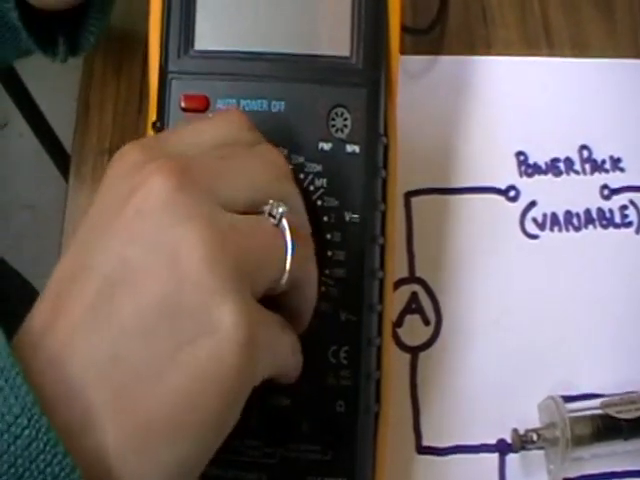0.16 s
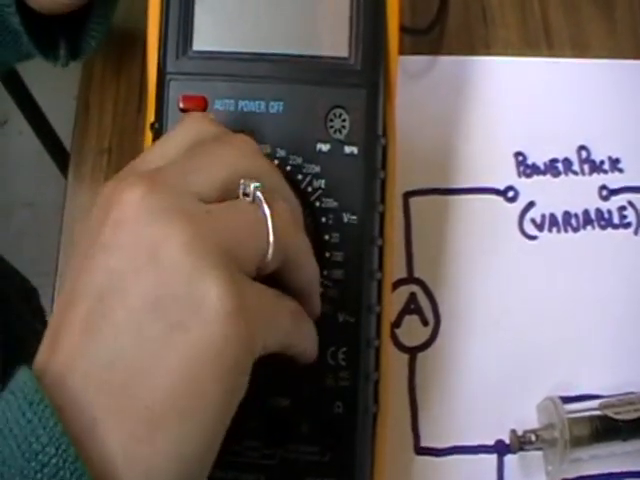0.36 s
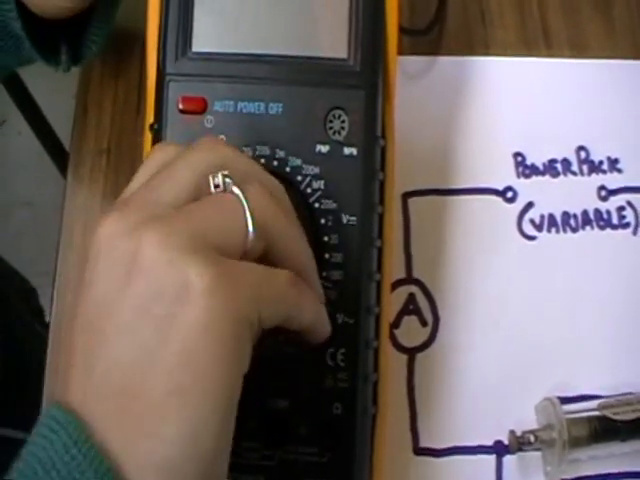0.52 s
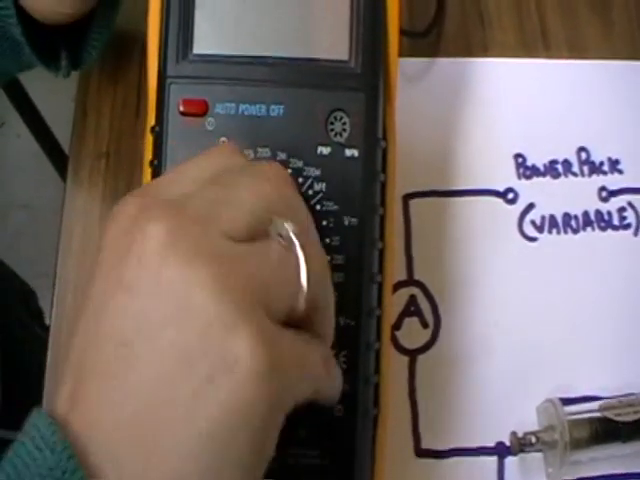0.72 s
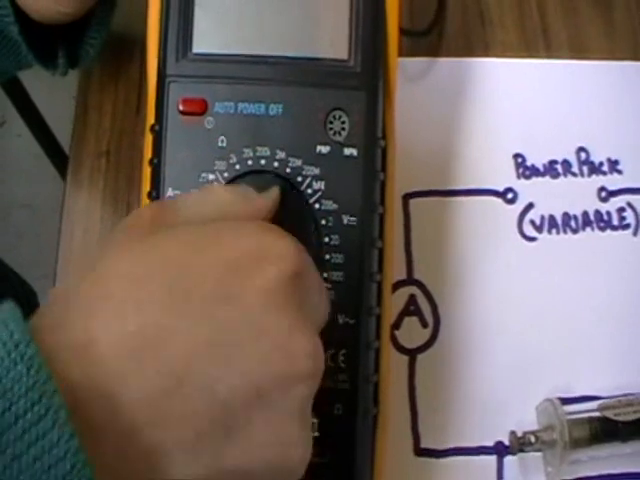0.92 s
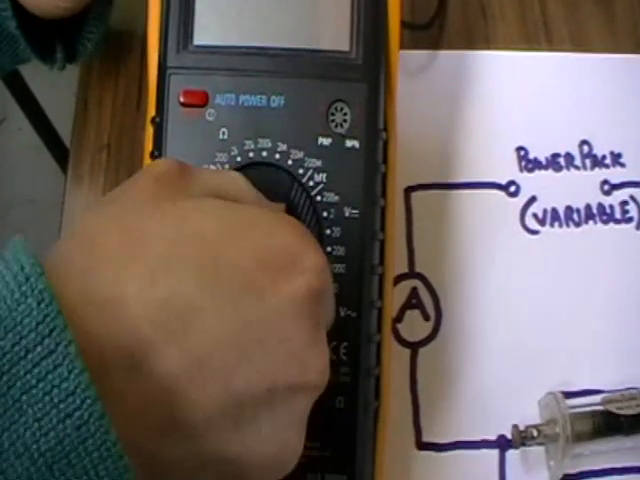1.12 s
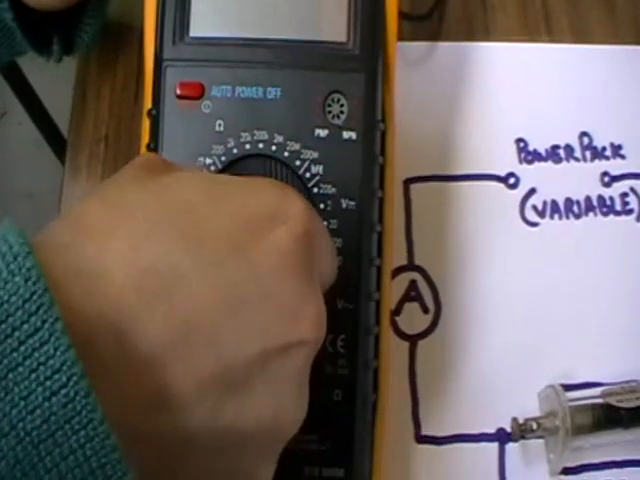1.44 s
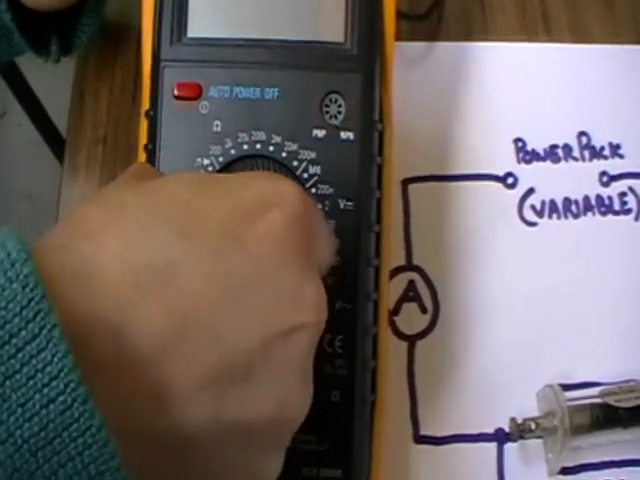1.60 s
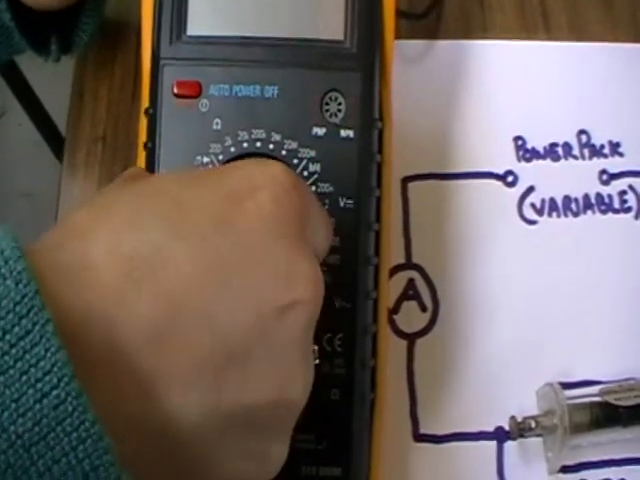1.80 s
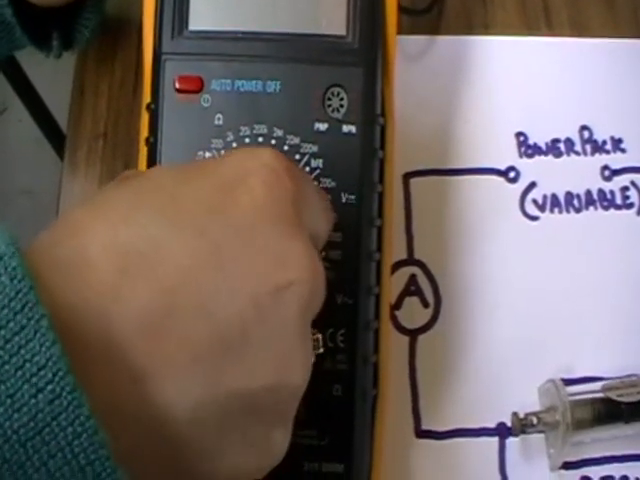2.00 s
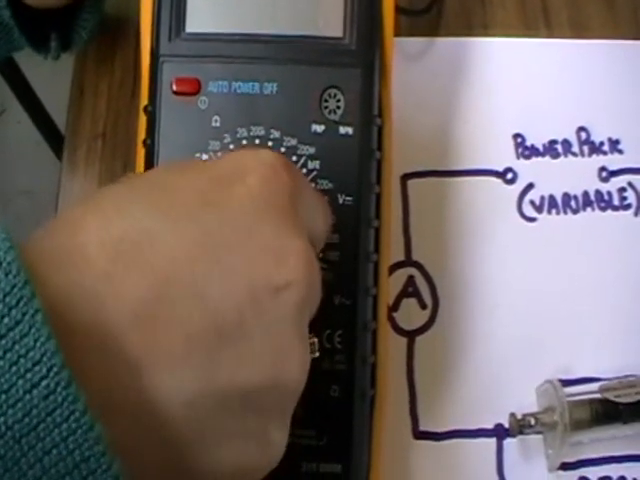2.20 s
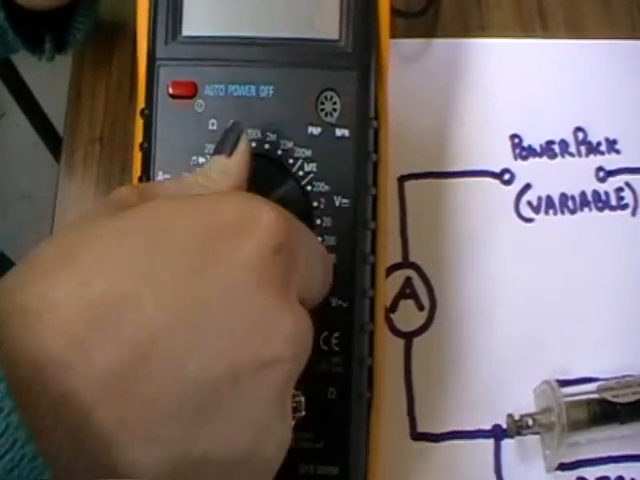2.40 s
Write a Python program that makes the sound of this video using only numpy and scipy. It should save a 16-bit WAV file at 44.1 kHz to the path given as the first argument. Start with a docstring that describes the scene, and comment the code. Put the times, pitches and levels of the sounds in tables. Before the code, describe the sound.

Sharp plastic dial clicks in two quick groups as a hand turns a meter's selector switch

```python
"""In a small quiet room with a faint hum, a hand turns the rotary selector of a plastic multimeter.
The meter lies on a wooden desk, close to the microphones. At each detent (a notch of the selector) a spring
chatters for a few milliseconds and rings the case: short noise bursts through resonances.
The desk adds soft low thumps. The loose knob ticks, fingers knock and rub it, and it creaks once, from
uneven slips. Random echoes that die away make the room, and filtered noise with two tones its background."""
import sys
import numpy as np
from scipy import signal
from scipy.fft import rfft, irfft
from scipy.io import wavfile
from scipy.ndimage import uniform_filter1d

SR = 44100
rng = np.random.default_rng(int(sys.argv[2]) if len(sys.argv) > 2 else 0)


def output_pcm(signal):
    """Save a mono or channel-first signal as 16-bit PCM at the path in sys.argv[1].

    Samples are clipped to [-1, 1] before scaling.
    """
    pcm = np.clip(np.atleast_2d(signal).T, -1, 1) * 32767
    wavfile.write(sys.argv[1], SR, np.round(pcm).astype(np.int16))


N = 112454  # length in samples

# steady air noise of the room: f/Hz, gain/dB
AIR_COLOUR = [(15, -80.5), (25, -42), (64, -17), (108, -11), (145, -6.5), (249, -10), (277, -4.5),
              (354, -13), (531, -15), (695, -20), (2280, -24), (3520, -28.5), (16000, -43.5)]
AIR_DB = -53.5  # level of the part shared by left and right
# left-right difference of the air noise, against the shared part: f/Hz, gain/dB
AIR_SIDE = [(30, -1.5), (60, -11), (120, -21.5), (1000, -11), (5000, -9), (12000, 0.5)]
# tones of the hum: f/Hz, level/dB
HUM_TONES = [(279.9, -62), (538.3, -71)]
HUM_WAVER_DB, HUM_WAVER_RAD, HUM_WAVER_HZ = 1, 0.13, 8.7  # typical level and phase wander, fastest wander

# tone of the room reflections: f/Hz, gain/dB
ECHO_COLOUR = [(100, 11), (400, 3.5), (1500, 1.5), (3000, 0), (6000, -5), (9000, -5.5), (15000, -7)]
# time for the room to fall by 60 dB: f/Hz, time/s
ECHO_DECAY = [(150, .4), (700, 1), (2000, 0.41), (5000, 0.53), (13000, 0.55)]
TAIL_DB, EARLY_DB = -19.5, -19.5  # before the room's tone is applied
EARLY_FALL_S, ECHO_START_S, ECHO_RISE_S = 0.022, 0.003, 0.0019
ECHO_SIDE = 0.41  # share of the reflections that differs between left and right

# soft dull rubbing on the knob, between and around snaps: middle t/s, half length/s, level/dB
SKIN_RUBS = [(0.825, 0.082, -54), (0.92, .007, -42.5), (1.221, .006, -55.5), (1.259, 0.04, -57.5),
             (1.492, 0.036, -47), (1.76, 0.025, -50.5), (2.057, .005, -56.5)]
RUB_TOP_HZ = 3000

# loudness of the creak over time: t/s, level/dB
CREAK_LOUDNESS = [(1.117, -38.5), (1.123, -35.5), (1.128, -29.5), (1.144, -38), (1.15, -36), (1.164, -36.5),
                  (1.168, -25.5), (1.178, -31), (1.183, -38.5), (1.205, -54)]
# case resonances that the creak excites: f/Hz, width/Hz, gain/dB
CREAK_RESONANCES = [(750, 105, -5.5), (1523, 110, 5.5), (1950, 250, -8), (2320, 84, 2.5), (2900, 120, -5),
                    (3720, 180, -8.5), (4600, 380, -16.5), (5480, 450, -32), (8400, 400, -23),
                    (11300, 690, -30)]
SLIP_HZ, SLIP_SCATTER = 604, 0.45  # middle slip rate, unevenness of the gaps (natural-log units)
SLIP_STRENGTH_DB, CREAK_GRIT, CREAK_TOP_HZ = 2, 0.76, 12000  # strength scatter, noise share, top edge

# thumps of the meter rocking on the desk: t/s, level/dB
DESK_THUMPS = [(.202, -45), (0.24, -31.5), (.434, -30.5), (0.46, -33), (.592, -52.5), (0.623, -46.5),
               (1.115, -35), (1.325, -32.5), (1.473, -36), (1.508, -38), (1.609, -43.5), (1.758, -40.5),
               (2.458, -41.5)]
# tone of a desk thump: f/Hz, gain/dB
DESK_COLOUR = [(30, -27.5), (60, -20), (100, -4.5), (140, -3.5), (200, -4.5), (270, -8), (450, -11.5),
               (900, -35), (3000, -76.5)]
THUMP_RISE_S, THUMP_FALL_S = 0.0017, 0.013

# light ticks of the loose knob and its contacts: t/s, level/dB, chatter/ms, top edge f/Hz
KNOB_TICKS = [(0.1898, -32.5, 1.1, 6900), (0.8144, -41, 2.1, 3500), (1.0226, -36.5, 0.39, 7240),
              (1.0698, -42.5, 0.87, 6900), (1.3170, -32, 1.9, 7000), (1.4474, -41.5, 1.23, 6960),
              (1.5747, -40, 8.3, 6000), (1.6041, -26, 2.8, 7600), (1.629, -42.5, 5.5, 4500),
              (1.767, -32.5, 0.82, 6000), (1.8779, -50.5, 1.47, 6970), (2.146, -33.5, 4, 7000),
              (2.157, -35.5, 5.3, 6000), (2.488, -47, 0.88, 10900)]
# finger knocks on the knob: t/s, level/dB, hollow f/Hz, hollow level/dB, brightness/dB, top edge f/Hz
FINGER_KNOCKS = [(1.0204, -36.5, 740, -34, -1, 3970), (1.1138, -24.5, 750, -56, -3.5, 8240),
                 (2.457, -31, 451, -26, 7, 9400), (2.479, -59, 600, -44.5, 0, 4000)]
# tone of ticks, knocks and rubs: f/Hz, gain/dB
KNOB_COLOUR = [(100, -14), (500, 0.5), (1000, -3.5), (1600, 0), (2300, 1.5), (4000, -2.5), (6000, -3),
               (9000, -11.5), (16000, -27.5)]
KNOCK_MS, KNOCK_BRIGHT_HZ = 0.99, 4800
HOLLOW_WIDTH, HOLLOW_FALL_MS = 0.92, 4.2  # width as a share of the pitch, fall time

# detent snaps: t/s, level/dB, chatter/ms, body/dB, treble/dB, top edge f/Hz, band f/Hz, its gain/dB
DETENT_SNAPS = [(0.1994, -5.5, 1.32, 0, 2, 14100, 3200, 1), (.2356, -11.5, 2.24, -0.5, 0, 15800, 5750, 2.5),
                (0.4318, -7.5, 2.0, -1.5, 3, 16700, 4600, -2), (0.453, -10, 3.1, 3, 0.5, 14900, 5480, 6.5),
                (0.588, -5.5, 3.56, 4, 7.5, 14380, 6600, 7.5),
                (0.6084, -11, 1.9, -1.5, 5.5, 14700, 4600, 8.5),
                (0.7862, -22, 1.8, 14.5, 5, 12700, 4450, 6.5),
                (1.3247, -8.5, 4.45, 2.5, 3, 14500, 5680, 5.5), (1.469, -14, 1.4, -1.5, 8, 12500, 6000, 12),
                (1.4729, -15.5, 2, 6, 1, 12000, 8100, 15), (1.504, -31, 1.7, 9.5, 7, 12000, 5700, 9),
                (1.5973, -15, 1.1, 0.5, 6, 12300, 5700, 6),
                (1.756, -22.5, 3.3, 7.5, 17.5, 10130, 9500, -0.5),
                (2.1403, -21, 1.9, 3.5, 14.5, 10400, 7500, 0)]
# resonances of the plastic case: f/Hz, width/Hz, gain/dB
CASE_RESONANCES = [(1060, 40, -17.5), (1518, 105, -5), (2196, 380, -5.5), (2810, 180, -9),
                   (3200, 140, -7.5), (3780, 440, -6), (4503, 210, -0.5), (5616, 457, 3), (6824, 990, -4.5),
                   (8100, 260, -8.5), (9500, 360, -10.5), (11430, 540, -12), (14400, 310, -24.5),
                   (15200, 500, -12)]
CRACK_DB, CRACK_LOW_HZ = -21.5, 120  # broad crack mixed with the resonances, its low edge
BODY_HZ, TREBLE_HZ, BAND_WIDTH_HZ = 3200, 7160, 900
TOP_SHELF_DB = -24.5  # what is left above a snap's top edge
LEAD_IN_DB, LEAD_IN_MS = -23.5, 1.1  # faint short noise just before each snap, level against the snap
CHATTER_RISE_MS, CHATTER_FALL_MS = 0.67, 0.99
RING_DB, RING_MS = -17.5, 5.8  # faint ring after the chatter, its fall time
SCATTER_HZ, SCATTER_SIDE = 10000, 0.64  # above this edge left and right hear a snap differently

# how much louder left is than right, for everything but the room tone: f/Hz, difference/dB
LEFT_OVER_RIGHT = [(250, -0.5), (1500, 1.1), (2500, 1.1), (4500, -0.8), (9000, -0.6), (13000, -2.5)]
CEILING, TOP_HZ = 0.8, 15800  # peaks are rounded towards the ceiling; treble is cut above the top

CLICK_SIZE = 8192  # samples computed for each short sound


def undb(db):
    """Turn decibels into a plain factor."""
    return 10 ** (np.asarray(db) / 20)


def unit(x):
    """Scale to an rms (average strength) of 1."""
    return x / np.sqrt(np.mean(x ** 2) + 1e-20)


def blow(x, db):
    """Scale a short sound so that its energy, spread over 4 ms, has this level."""
    return x * undb(db) * np.sqrt(0.004 * SR / np.sum(x ** 2))


def freqs(size):
    """Frequencies in Hz of a spectrum of this many samples, never below 1 Hz."""
    return np.maximum(np.fft.rfftfreq(size, 1 / SR), 1)


def curve(points, f):
    """Read (Hz, value) points on a log-frequency axis."""
    p = np.array(points, float)
    return np.interp(np.log(f), np.log(p[:, 0]), p[:, 1])


def shape(x, gain):
    """Filter with the given gain per frequency, without sounding ahead of its input."""
    size = len(x)
    # folding the cepstrum (the spectrum of the log gain) forward gives minimum phase
    cepstrum = irfft(np.log(gain + 1e-7), size)
    cepstrum[1:size // 2] *= 2
    cepstrum[size // 2 + 1:] = 0
    return irfft(rfft(x) * np.exp(rfft(cepstrum)), size)


def resonances(modes, f):
    """Gain of a set of resonances, their powers added."""
    power = 0
    for hz, width, db in modes:
        detuning = (f * f - hz * hz) / (f * width)
        power = power + undb(db) ** 2 / (1 + detuning ** 2)
    return np.sqrt(power)


def below(f, hz, order=4):
    """Gain that passes what lies below an edge; a higher order is steeper."""
    return 1 / np.sqrt(1 + (f / hz) ** (2 * order))


def add(out, s, x):
    """Mix a short sound in at a time in seconds."""
    i = int(s * SR)
    out[i:i + len(x)] += x[:len(out) - i]


def burst(envelope, size=200):
    """Dense random impacts under an envelope, with an even broad spectrum."""
    x = rng.standard_normal(len(envelope)) * envelope
    for _ in range(2):
        power = uniform_filter1d(abs(rfft(x)) ** 2, size)
        x = shape(x, 1 / np.sqrt(power + 1e-12))
    return x


def chatter(ms):
    """A contact that builds up, rattles briefly, dies away and leaves a faint ring."""
    t_ms = np.arange(CLICK_SIZE) / SR * 1e3
    after = np.maximum(t_ms - ms, 0)
    rise = 1 - np.exp(-t_ms / CHATTER_RISE_MS)
    fall = np.exp(-after / CHATTER_FALL_MS)
    ring = undb(RING_DB) * np.exp(-after / RING_MS)
    return burst(rise * (fall + ring), size=130)


def waver():
    """Slow random wandering with an rms of 1."""
    return unit(shape(rng.standard_normal(N), below(freqs(N), HUM_WAVER_HZ, order=2)))


def room_tone():
    """Soft steady air noise from filtered noise, with a hum of wavering sine tones."""
    f, t = freqs(N), np.arange(N) / SR
    gain = undb(curve(AIR_COLOUR, f))
    mid = shape(rng.standard_normal(N), gain)
    side = shape(rng.standard_normal(N), gain * undb(curve(AIR_SIDE, f)))
    air = np.array([mid + side, mid - side]) * undb(AIR_DB) / np.std(mid)
    hum = np.zeros(N)
    for hz, db in HUM_TONES:
        loudness = np.sqrt(2) * undb(db + HUM_WAVER_DB * waver())
        hum += loudness * np.sin(2 * np.pi * hz * t + HUM_WAVER_RAD * waver())
    return air + hum


def reflections(size=32768):
    """One response of the room: early bounces off desk and hand, then a tail that decays by band."""
    t, f = np.arange(size) / SR, freqs(size)
    spectrum, tail = rfft(rng.standard_normal(size)), 0
    for k, (_, t60) in enumerate(ECHO_DECAY):
        # each band fades over to its neighbours
        band = curve([(row[0], j == k) for j, row in enumerate(ECHO_DECAY)], f)
        tail = tail + irfft(spectrum * band) * np.exp(-np.log(1000) * t / t60)
    onset = np.clip((t - ECHO_START_S) / ECHO_RISE_S, 0, 1)
    early = rng.standard_normal(size) * np.exp(-t / EARLY_FALL_S)
    both = undb(TAIL_DB) * unit(tail * onset) + undb(EARLY_DB) * unit(early * onset)
    return shape(both / np.sqrt(size), undb(curve(ECHO_COLOUR, f)))


def rubs():
    """Fingertips slide softly over the knob: dull noise that swells and fades."""
    t, f = np.arange(N) / SR, freqs(N)
    colour = undb(curve(KNOB_COLOUR, f)) * below(f, RUB_TOP_HZ, order=2)
    skin = unit(shape(rng.standard_normal(N), colour))
    swell = sum(undb(db) * np.exp(-((t - s) / half) ** 2) for s, half, db in SKIN_RUBS)
    return skin * swell


def creak():
    """Uneven, gritty stick and slip of the knob rings the resonances of the case."""
    f = freqs(N)
    chance = rng.standard_normal((4000, 2))
    gaps_s = np.exp(SLIP_SCATTER * chance[:, 0]) / SLIP_HZ
    at = (np.cumsum(gaps_s) * SR).astype(int)
    slips = np.bincount(at, undb(SLIP_STRENGTH_DB * chance[:, 1]), N)[:N]
    slips = unit(slips - slips.mean()) + CREAK_GRIT * rng.standard_normal(N)
    gain = resonances(CREAK_RESONANCES, f) * below(f, CREAK_TOP_HZ, order=20)
    s, db = np.array(CREAK_LOUDNESS).T
    force = undb(np.interp(np.arange(N) / SR, s, db, left=-200, right=-200))
    return shape(slips * force, gain) / np.std(shape(slips, gain))


def desk():
    """The desk booms softly as the meter rocks: short low bursts of noise."""
    out, t = np.zeros(N), np.arange(CLICK_SIZE) / SR
    envelope = (1 - np.exp(-t / THUMP_RISE_S)) * np.exp(-t / THUMP_FALL_S)
    colour = undb(curve(DESK_COLOUR, freqs(CLICK_SIZE)))
    for s, db in DESK_THUMPS:
        add(out, s, blow(shape(burst(envelope, size=24), colour), db))
    return out


def ticks():
    """The loose knob and its contacts tick lightly: brief chatter with a soft top."""
    out, f = np.zeros(N), freqs(CLICK_SIZE)
    colour = undb(curve(KNOB_COLOUR, f))
    for s, db, ms, top_hz in KNOB_TICKS:
        add(out, s, blow(shape(chatter(ms), colour * below(f, top_hz, order=2)), db))
    return out


def knocks():
    """Fingers knock the knob: a brief contact plus a hollow note from one wide resonance."""
    out, f = np.zeros(N), freqs(CLICK_SIZE)
    colour = undb(curve(KNOB_COLOUR, f))
    fall = np.exp(-np.arange(CLICK_SIZE) / SR * 1e3 / HOLLOW_FALL_MS)
    for s, db, hz, hollow_db, bright_db, top_hz in FINGER_KNOCKS:
        bright = undb(bright_db * (1 - below(f, KNOCK_BRIGHT_HZ) ** 2))
        contact = shape(chatter(KNOCK_MS), colour * bright * below(f, top_hz))
        add(out, s, blow(contact, db))
        hollow = resonances([(hz, hz * HOLLOW_WIDTH, 0)], f) ** 2 * below(f, 1.9 * hz, order=6)
        add(out, s, blow(shape(burst(fall, size=24), hollow), hollow_db))
    return out


def detents():
    """Faint noise leads into each snap of the spring, which rings the case."""
    mid, side, f = np.zeros(N), np.zeros(N), freqs(CLICK_SIZE)
    crack = undb(CRACK_DB) * (1 - below(f, CRACK_LOW_HZ, order=1) ** 2)
    case = np.hypot(resonances(CASE_RESONANCES, f), crack)
    for s, db, ms, body_db, treble_db, top_hz, band_hz, band_db in DETENT_SNAPS:
        tone_db = body_db * below(f, BODY_HZ) ** 2
        tone_db = tone_db + treble_db * (1 - below(f, TREBLE_HZ, order=6) ** 2)
        # each snap has one band raised, lowered or left alone
        tone_db = tone_db + band_db * resonances([(band_hz, BAND_WIDTH_HZ, 0)], f) ** 2
        top = np.hypot(below(f, top_hz, order=12), undb(TOP_SHELF_DB))
        gain = case * undb(tone_db) * top
        for out in (mid, side):  # separate chatter for each
            add(out, s, blow(shape(chatter(ms), gain), db))
        lead_in = shape(chatter(LEAD_IN_MS), gain)
        add(mid, s - LEAD_IN_MS / 1e3, blow(lead_in, db + LEAD_IN_DB))
    # only the top treble scatters left and right
    scatter = SCATTER_SIDE * shape(side, 1.01 - below(freqs(N), SCATTER_HZ) ** 2)
    return mid, scatter


def scene():
    """The meter close up, its reflections and the room tone, heard by a close pair of microphones."""
    snaps, scatter = detents()
    near = snaps + ticks() + knocks() + desk() + creak() + rubs()
    echo_mid = signal.fftconvolve(near, reflections())[:N]
    echo_side = signal.fftconvolve(near, reflections())[:N]
    mid, side = near + echo_mid, ECHO_SIDE * echo_side + scatter
    left_db = curve(LEFT_OVER_RIGHT, freqs(N)) / 2  # half on each side
    left = shape(mid + side, undb(left_db))
    right = shape(mid - side, undb(-left_db))
    return np.array([left, right]) + room_tone()


def record(dry):
    """The recorder rounds the loudest peaks and cuts the top."""
    rounded = CEILING * np.tanh(dry / CEILING)
    top_cut = signal.ellip(8, 0.2, 70, TOP_HZ, fs=SR, output="sos")
    return signal.sosfilt(top_cut, rounded)


dry = scene()
out = record(dry)
output_pcm(out)
```